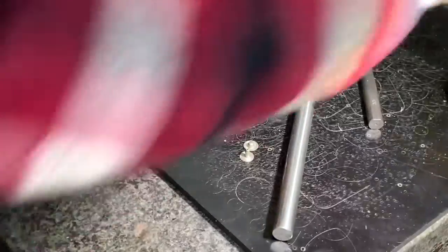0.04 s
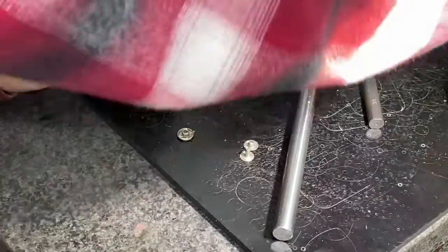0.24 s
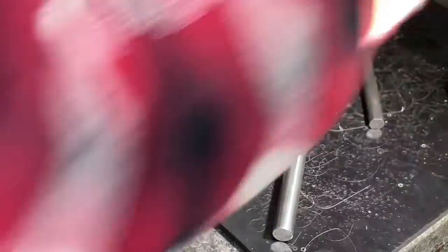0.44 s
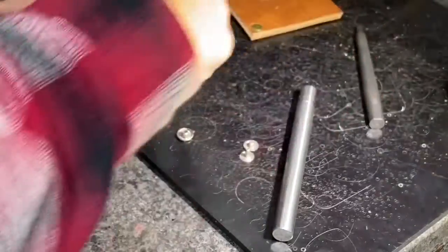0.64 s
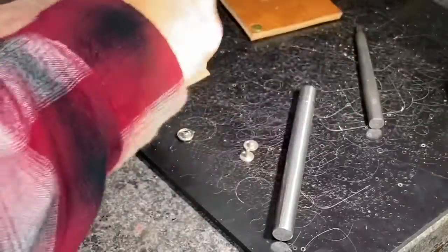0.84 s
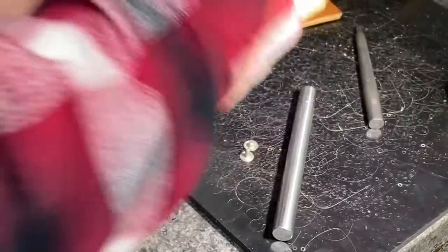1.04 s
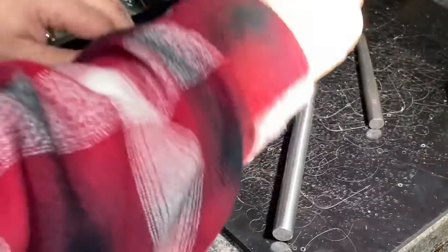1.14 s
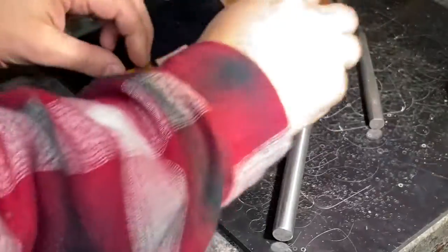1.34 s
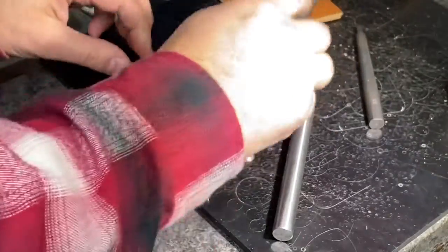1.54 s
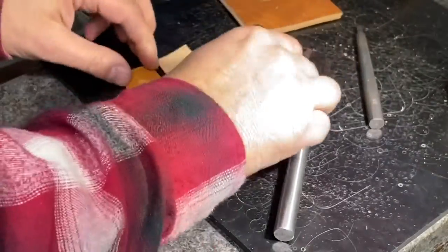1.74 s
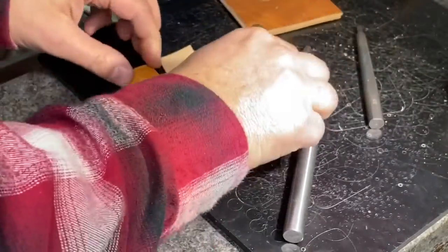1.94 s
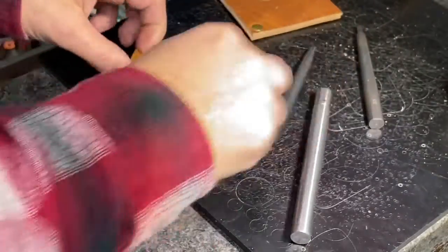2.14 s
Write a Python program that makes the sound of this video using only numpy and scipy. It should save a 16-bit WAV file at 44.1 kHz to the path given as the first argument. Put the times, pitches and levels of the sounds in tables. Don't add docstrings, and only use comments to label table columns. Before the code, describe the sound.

Close up in a small room, a hammer hits a steel punch with a woody double thud, small hardware clicks to rest, a sleeve rustles faintly, and later a steel rod knocks down on a slab, ringing lightly.

```python
import sys
import numpy as np
from scipy import signal
from scipy.fft import rfft, irfft
from scipy.io import wavfile
from scipy.ndimage import uniform_filter1d

SR = 44100
rng = np.random.default_rng(int(sys.argv[2]) if len(sys.argv) > 2 else 0)


def level_to_linear(level):
    exponent = np.asarray(level, float) / 20
    return 10 ** exponent


def wav_out(sig):
    wavfile.write(sys.argv[1], SR, np.round(np.clip(np.atleast_2d(sig).T, -1, 1) * 32767).astype(np.int16))


N = 97020
RISE_MS = 1.2

# [t/s, peak level/dB, contact/ms]
BLOWS = [(.2200, -15.5, 0.9), (.2212, -6.5, 0.42), (.2240, -3, 0.56), (.2300, -14, 0.93),
         (.2430, -7.5, 0.65), (.2485, -5, 0.53), (.2513, -6, 0.45), (.2545, -7, 0.44), (.2570, -6, 2.3),
         (.2640, -13.5, 1.1), (.2740, -15, 0.55), (.2920, -18.5, 0.61), (.3350, -28.5, 2.7)]
# [f/Hz, level/dB, t60/s]
BENCH_MODES = [(103, -21.5, .2), (176.3, -8.5, 0.13), (222, -9.5, 0.16), (293, -3, 0.077),
               (340, 4.5, 0.037), (428, 0.5, 0.043), (572, -2, 0.021), (621, -7.5, 0.12), (691, -3, 0.051),
               (870, -4, 0.061), (1011, -2, .03), (1312, -17.5, 0.04), (1526, -3.5, 0.036),
               (2087, -5.5, 0.014)]


def hammer_blow():
    return strike(BLOWS, BENCH_MODES, -8.5, 0.048, 1700, RISE_MS, 0.87)


# [t/s, peak level/dB, contact/ms]
CRACKS = [
    (.2188, -23, .1),
    (.2225, -19, .12),
    (.2490, -17, .13),
    (.2545, -20, .11),
]
# [f/Hz, level/dB, t60/s]
HEAD_MODES = [(1500, 2, .025), (2050, 1, .03), (2600, -1, .025), (3630, -9, .015), (5080, -11, .06)]


def hammer_face():
    return strike(CRACKS, HEAD_MODES, -10, 0.011, 2900, 0.27, 0.34)


# [t/s, peak level/dB, contact/ms]
CHATTER = [
    (.2200, -29.5, 0.038),
    (.2275, -31, 0.026),
    (.2365, -31, 0.032),
    (.2680, -28, 0.024),
    (.2740, -36, 0.045),
]
# [f/Hz, level/dB, t60/s]
PUNCH_MODES = [(9600, -4, .02), (10050, 0, .028), (14260, -20, .04)]


def punch_chatter():
    return strike(CHATTER, PUNCH_MODES, -10.5, 0.018, 9000, 0.091, 0.017)


SPOT_DB = 2.5


def strike(events, modes, crack_db, crack_t60, crack_hz, rise_ms, loose):
    out = np.zeros(N)
    t = np.arange(SR // 2) / SR
    hz, db, t60 = np.array(modes).T[:, :, None]
    for start, peak_db, contact_ms in events:
        spot, phase, detune = loose * rng.standard_normal((3, len(modes), 1))
        decay = level_to_linear(db + SPOT_DB * spot - 60 * t / t60)
        ring = (decay * np.sin(2 * np.pi * hz * (1 + .06 * detune) * t + phase)).sum(0)
        swing = 1 - np.exp(-t * 1000 / rise_ms)
        noise = evened(band(rng.standard_normal(len(t)), crack_hz / 5, crack_hz))
        crack = level_to_linear(crack_db - 60 * t / crack_t60) * noise
        body = ring / abs(ring).max() * swing + crack
        push = (t[:300] + .5 / SR) * 4500 / max(contact_ms, .02)
        sound = np.convolve(body, push * np.exp(-push))
        part = out[int(start * SR):][:len(sound)]
        part += level_to_linear(peak_db) * sound[:len(part)] / abs(sound).max()
    return out


def evened(x):
    return x / np.sqrt(np.mean(x ** 2) + 1e-20)


def band(x, low_hz, high_hz, order=1):
    edges = [low_hz, min(high_hz, SR / 2.1)]
    return signal.sosfilt(signal.butter(order, edges, "band", fs=SR, output="sos"), x)


# [t/s, peak level/dB, contact/ms]
BOUNCES = [
    (.3858, -23, .11),
    (.4335, -33, .12),
    (.4670, -37, .1),
    (.4900, -44, .13),
    (.5070, -50, .14),
]
# [f/Hz, level/dB, t60/s]
PART_MODES = [(2150, 0, .012), (3680, -17, .014), (5545, -4, .012), (5620, -26, .055), (7100, -16, .014),
              (10900, -14, .007)]


def loose_part():
    return strike(BOUNCES, PART_MODES, -21, 0.022, 3500, 0.35, 0.031)


# [t/s, peak level/dB, contact/ms]
THUMPS = [(.3890, -22.5, 0.29), (.3970, -23.5, 0.32), (.4030, -25.5, 0.62), (.4130, -29, 0.97),
          (.4240, -34, 0.37), (.4440, -29.5, 0.93), (.4510, -29, 0.31), (.4720, -31.5, 0.4),
          (.4950, -35, .4), (.5250, -42.5, 0.49)]


def bench_thumps():
    return strike(THUMPS, BENCH_MODES, -14, 0.088, 1300, RISE_MS, 1.0)


# [t/s, peak level/dB, contact/ms]
TICKS = [
    (.5553, -39, .025),
    (.5600, -43, .025),
    (.5650, -47, .025),
    (1.2267, -64, .025),
]
# [f/Hz, level/dB, t60/s]
SNAP_MODES = [(5114, -17, .06), (7100, -19, .04), (9442, -2, .03), (11620, -9, .02), (13130, -5, .035),
              (13730, 0, .03)]
# [t/s, peak level/dB, contact/ms]
TINK = [
    (.9444, -54, .025),
]
# [f/Hz, level/dB, t60/s]
RIVET_MODES = [(7160, 0, .17), (9415, -9, .12), (11750, 0, .2), (13780, -1, .13)]


def snaps():
    ticks = strike(TICKS, SNAP_MODES, -24, .06, 15000, .2, .1)
    return ticks + strike(TINK, RIVET_MODES, -7, .01, 15000, .1, 0)


# [t/s, peak level/dB, contact/ms]
KNOCKS = [
    (1.7281, -15, 0.48),
    (1.8748, -39.5, 0.65),
]
# [f/Hz, level/dB, t60/s]
SLAB_MODES = [(487.4, -24, 0.2), (577, -10, 0.13), (620, 6, 0.031), (790, -18, 0.08), (1113, -15.5, 0.036),
              (1302, -20.5, 0.061), (1750, -32, 0.062), (2150, -32, 0.034), (2730, -38, 0.023),
              (3500, -42, .02)]
# [t/s, peak level/dB, contact/ms]
DROP = [
    (1.9020, -16.5, 0.44),
    (1.9042, -13.5, 0.53),
    (1.9110, -49.5, 0.52),
]
# [f/Hz, level/dB, t60/s]
FLAT_MODES = [(160.3, -6.5, 0.079), (258, -15.5, 0.017), (447, -23, 0.047), (594, 5.5, 0.059),
              (1085, 24.5, 0.029), (1260, -7.5, 0.03), (1520, 10, 0.028), (1980, -6, 0.015),
              (2300, -4, .02), (3540, -12, .015)]


def punch_laid_down():
    knocks = strike(KNOCKS, SLAB_MODES, -19, 0.036, 3200, 1.66, .02)
    return knocks + strike(DROP, FLAT_MODES, -10.5, 0.02, 2700, 0.4, 0.059)


# [t/s, peak level/dB, contact/ms]
TAPS = [
    (.0722, -47.5, 0.23),
    (.0745, -45.5, 0.79),
    (.0840, -50.5, 0.73),
    (.8715, -37.5, 0.28),
    (.8735, -43, 0.4),
    (.8765, -44, 0.23),
    (.8800, -32.5, 0.27),
    (1.8707, -48, 0.15),
    (2.1960, -55.5, 0.2),
]
# [f/Hz, level/dB, t60/s]
TIP_MODES = [(562.1, -1, 0.04), (680, -3, 0.022), (1050, -4.5, .016), (1780, -11.5, 0.015),
             (2383, -19.5, 0.011), (3100, -22, 0.0087)]


def tip_taps():
    return strike(TAPS, TIP_MODES, -12, 0.011, 3500, .4, 0.49)


# [t/s, peak level/dB, contact/ms]
RINGS = [
    (.8715, -54, 0.027),
    (.8770, -44.5, 0.047),
    (1.6537, -67, 0.019),
    (1.7276, -42, 0.071),
]
# [f/Hz, level/dB, t60/s]
ROD_MODES = [(4545, -4, .09), (4400, -16, .04), (10430, -1, .065)]
# [t/s, peak level/dB, contact/ms]
CLACK = [
    (1.9022, -35.5, 0.028),
    (1.9110, -43.5, 0.022),
]
# [f/Hz, level/dB, t60/s]
RODS_MODES = [(6930, -8, .06), (9680, -8, .09), (10450, -2, .07), (13880, 2, .025)]


def rod_ring():
    touched = strike(RINGS, ROD_MODES, 3, .022, 9000, .1, 0)
    return touched + strike(CLACK, RODS_MODES, 0.98, 0.04, 14000, .1, 0.049)


# [t/s, length/s, f/Hz, level/dB]
SLIDES = [
    (.95, 0.17, 2150, -84.5),
    (0.946, 0.2, 4460, -79),
    (1.209, 0.07, 10200, -80),
    (1.946, 0.2, 11170, -71.5),
]


def slides():
    t = np.arange(N) / SR
    out = np.zeros(N)
    for start, length, hz, db in SLIDES:
        rasp = evened(band(rng.standard_normal(N), hz * 0.926, hz * 1.11, order=2))
        stroke = np.sin(np.pi * np.clip((t - start) / length, 0, 1)) ** 0.5415
        out += level_to_linear(db) * rasp * stroke
    return out


# [f/Hz, t60/s]
ROOM_DECAY = [(60, 0.94), (250, 0.43), (1000, 0.22), (4000, 0.28), (12000, 0.077)]
# [f/Hz, level/dB]
WIDTH = [(60, -24.5), (160, -13.5), (450, -6.5), (1200, -3), (1900, -5), (2600, -12), (6000, -9.5)]


def room(x):
    taps = np.zeros((4, SR))
    at = np.arange(120, SR - 20, 20) + rng.integers(0, 20, (4, (SR - 121) // 20))
    np.put_along_axis(taps, at, rng.choice([-1., 1.], at.shape), 1)
    hz, t, z = signal.stft(taps[:2], SR, nperseg=256)
    decay = level_to_linear(-60 * t / read(ROOM_DECAY, hz)[:, None])
    tail = signal.istft(z * decay, SR, nperseg=256)[1][:, :SR]
    early = taps[2:] * level_to_linear(-60 * np.arange(SR) / SR / 0.029)
    wet = level_to_linear(-16) * tail / np.linalg.norm(tail[0])
    wet = wet + level_to_linear(-10) * early / np.linalg.norm(early[0])
    mid, side = signal.fftconvolve(x[None], wet, axes=1)[:, :N]
    return np.array([mid, level_to_linear(3.5) * colour(side, WIDTH)])


def read(points, hz):
    f, value = np.transpose(points)
    return np.interp(np.log(hz + 1), np.log(f + 1), value)


def colour(x, points):
    return irfft(rfft(x) * level_to_linear(read(points, np.fft.rfftfreq(N, 1 / SR))), N)


# [f/Hz, level/dB per Hz]
SLEEVE = [(700, -4), (2100, 1), (4400, -6), (7000, -0.5), (10500, -5.5), (14000, -9), (16000, -26)]
# [t/s, level/dB]
SLEEVE_LEVEL = [(0, -88), (.2, -85.5), (.45, -90), (.6, -90), (.7, -99), (.78, -93), (.85, -101.5),
                (.95, -89), (1.1, -94), (1.17, -100), (1.26, -95), (1.4, -102), (1.85, -100), (1.95, -86),
                (2.1, -99), (2.2, -94.5)]


def sleeve():
    return level(SLEEVE_LEVEL) * level_to_linear(15) * hiss(SLEEVE, 0.68, 1.9)


# [f/Hz, level/dB per Hz]
RUMBLE = [(25, -31.5), (36, -14), (55, 4.5), (100, -10), (180, -19), (360, -30), (900, -36.5), (1700, -63)]
# [t/s, level/dB]
RUMBLE_LEVEL = [(0, -52.5), (.18, -51.5), (.205, -55), (.3, -37.5), (.6, -49), (.72, -56.5), (.8, -59.5),
                (.88, -52.5), (.98, -54), (2.2, -54)]


def rumble():
    return level(RUMBLE_LEVEL) * level_to_linear(1.5) * hiss(RUMBLE, .8, 0.26)


# [f/Hz, level/dB rms]
HUM = [(240, -71), (360, -77.5)]


def mains_hum():
    t = np.arange(N) / SR
    hum = sum(level_to_linear(db) * np.sqrt(2) * np.sin(2 * np.pi * (hz * t + rng.random())) for hz, db in HUM)
    return hum * level_to_linear(np.array([[0], [-18]]))


def level(curve):
    t, db = np.transpose(curve)
    return level_to_linear(np.interp(np.arange(N) / SR, t, db))


def hiss(points, patchy_db, flicker_db):
    frames = N // 128 + 5
    a, b, patches = rng.standard_normal((3, 2, frames, 257)).transpose(0, 1, 3, 2)
    patches = uniform_filter1d(patches[0], size=7, axis=0)
    patches = evened(uniform_filter1d(patches, size=16, axis=1))
    flicker = evened(uniform_filter1d(rng.standard_normal(frames), size=5))
    z = (a + 1j * b) * level_to_linear(patchy_db * patches + flicker_db * flicker)
    x = signal.istft(z, nperseg=512, noverlap=384)[1][:, :N]
    x = colour(x, points)
    return np.array([x[0], colour(x[1], WIDTH)]) / x[0].std()


def scene():
    low_cut_hz = 82
    near_wet_db = -4
    far = hammer_blow() + hammer_face() + punch_chatter() + loose_part() + bench_thumps() + snaps()
    far = band(far, low_cut_hz, SR, order=2)
    near = punch_laid_down() + tip_taps() + rod_ring()
    near = band(near, low_cut_hz, SR, order=2) + slides()
    background = sleeve() + rumble() + mains_hum()
    mid, side = room(far + level_to_linear(near_wet_db) * near) + background
    return np.array([far + near + mid + side, far + near + mid - side])


def roll_off(x):
    return signal.sosfilt(signal.butter(12, 15980, fs=SR, output="sos"), x)


def record(dry):
    drift_from_hz, half_turn_hz = 6700, 1793.4
    hz = np.fft.rfftfreq(N, 1 / SR)
    turn = np.pi / 2 * np.maximum(hz - drift_from_hz, 0) / half_turn_hz
    ports = irfft(rfft(dry) * np.exp(1j * np.outer([-1, 1], turn)), N)
    mix = 1.8 * np.tanh(ports / 1.8)
    return roll_off(mix)


dry = scene()
out = record(dry)
wav_out(out)
```